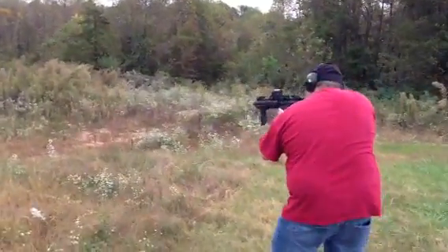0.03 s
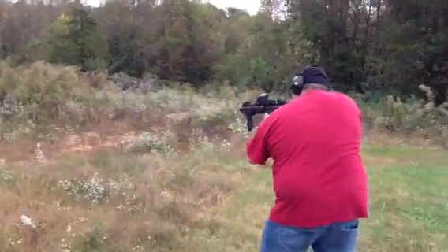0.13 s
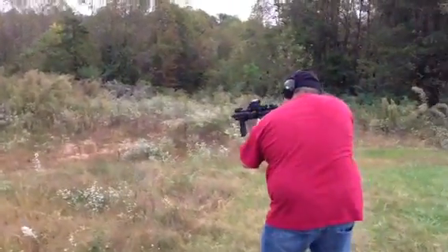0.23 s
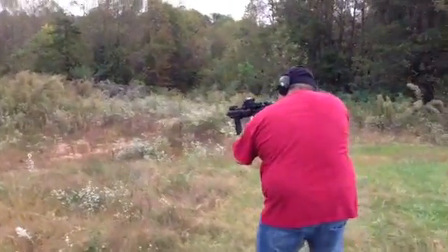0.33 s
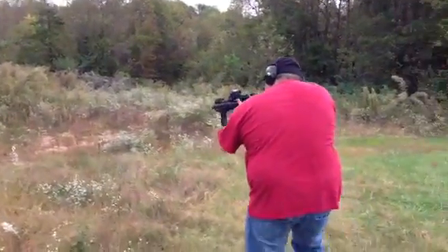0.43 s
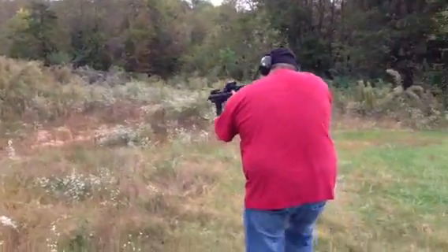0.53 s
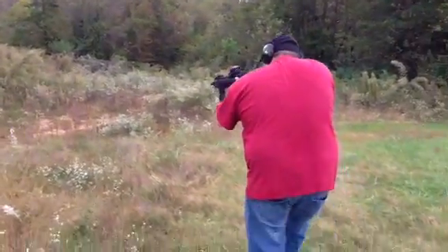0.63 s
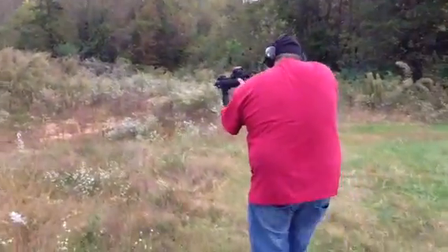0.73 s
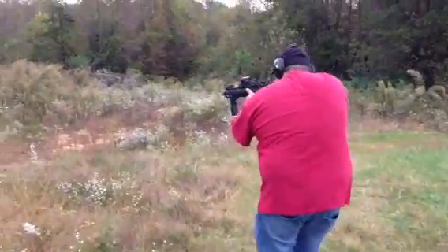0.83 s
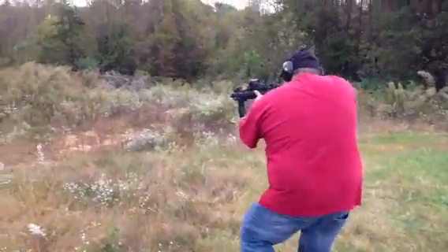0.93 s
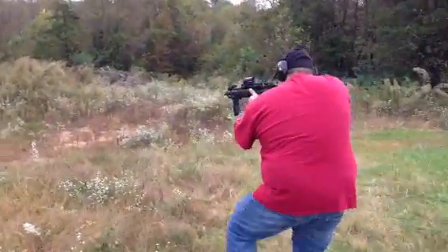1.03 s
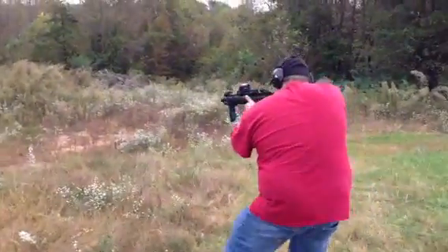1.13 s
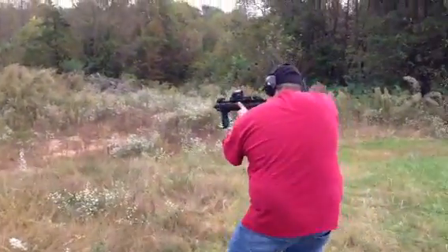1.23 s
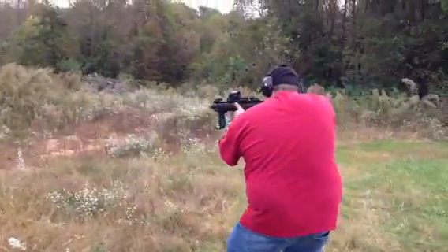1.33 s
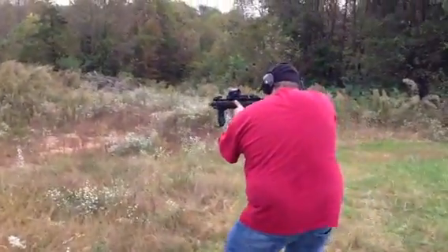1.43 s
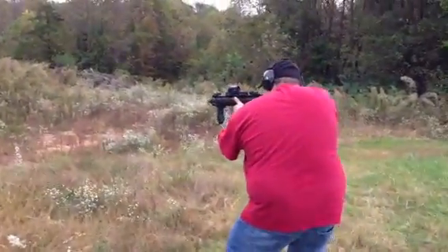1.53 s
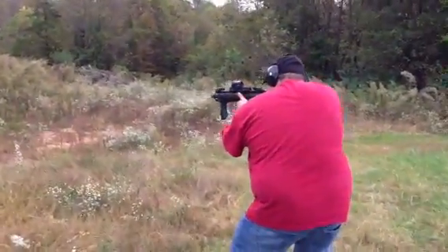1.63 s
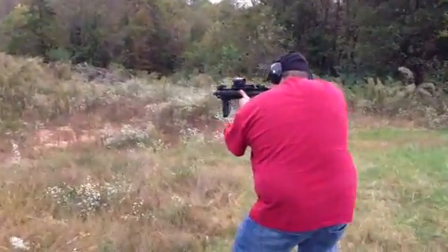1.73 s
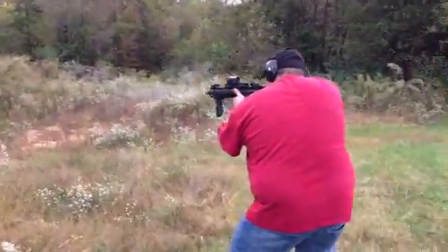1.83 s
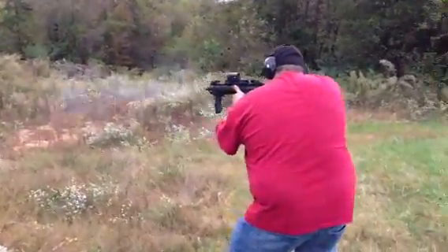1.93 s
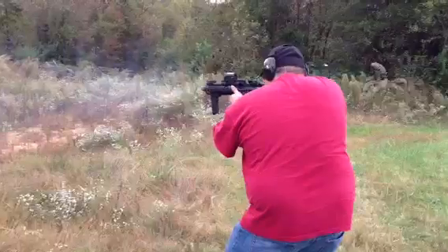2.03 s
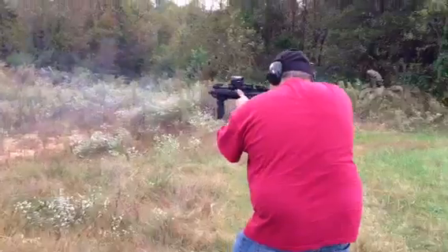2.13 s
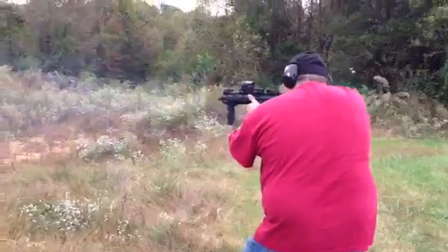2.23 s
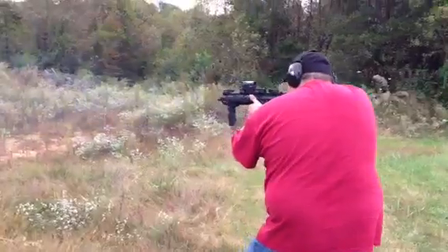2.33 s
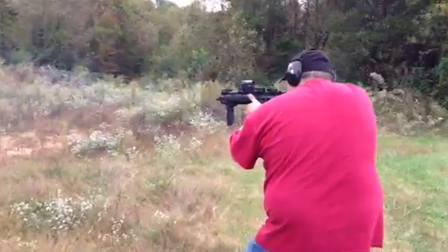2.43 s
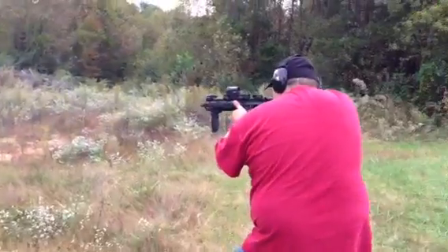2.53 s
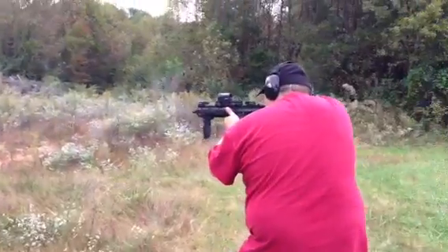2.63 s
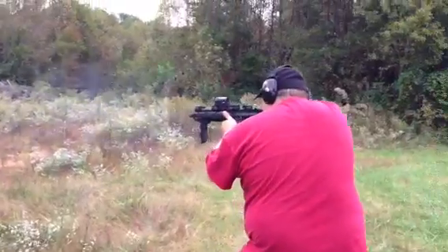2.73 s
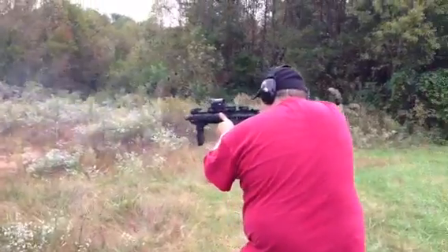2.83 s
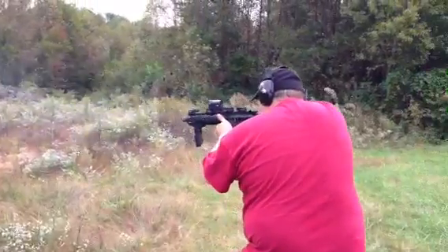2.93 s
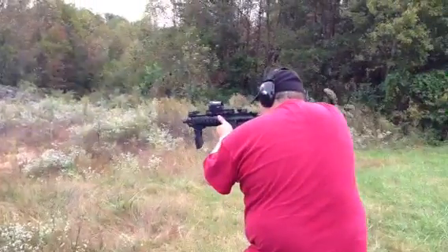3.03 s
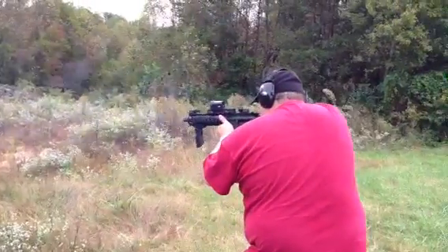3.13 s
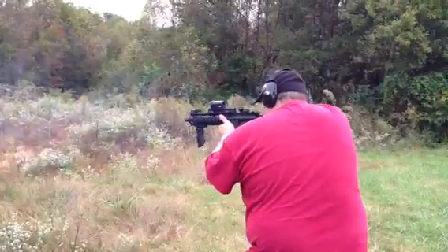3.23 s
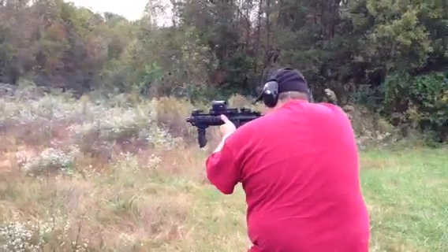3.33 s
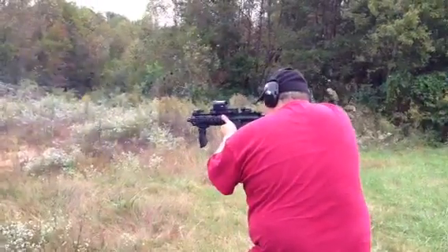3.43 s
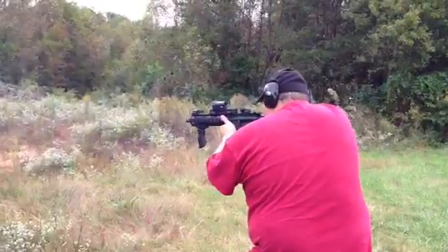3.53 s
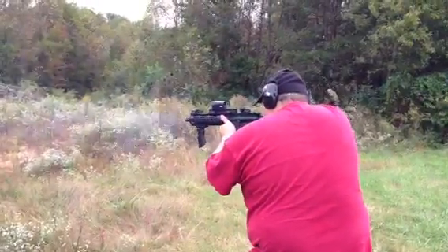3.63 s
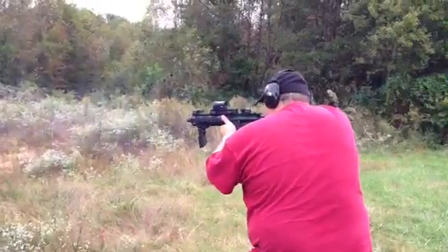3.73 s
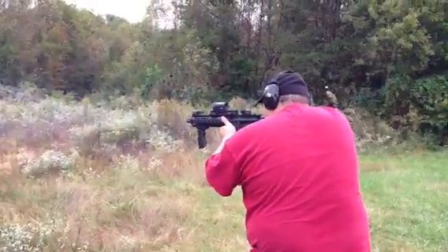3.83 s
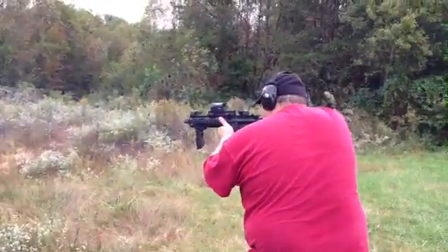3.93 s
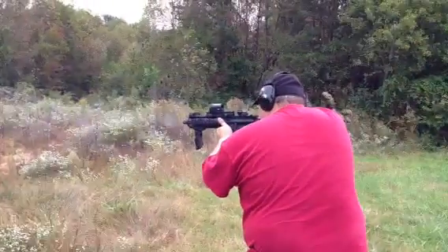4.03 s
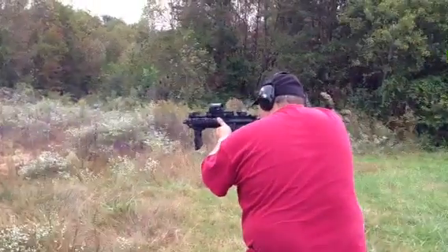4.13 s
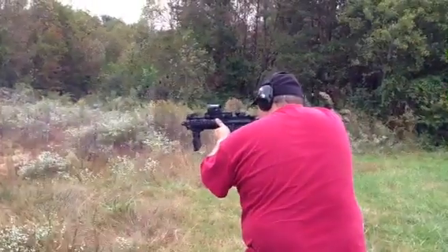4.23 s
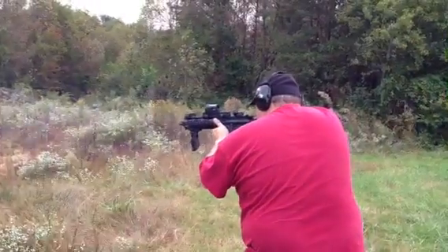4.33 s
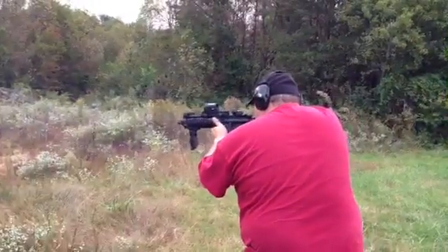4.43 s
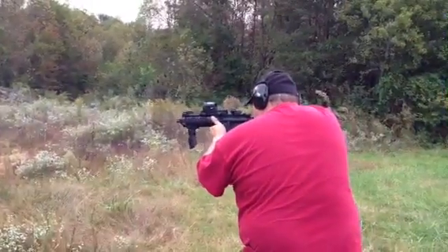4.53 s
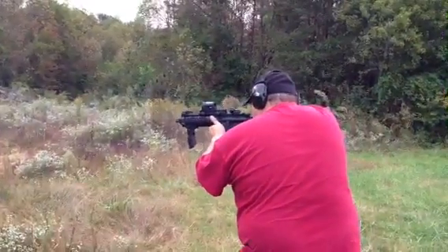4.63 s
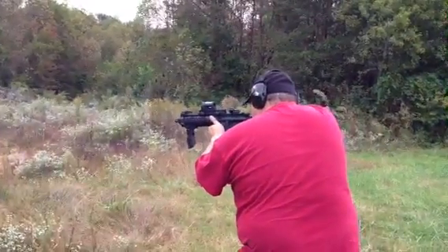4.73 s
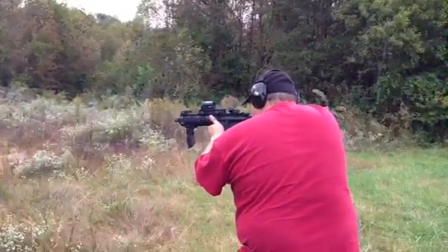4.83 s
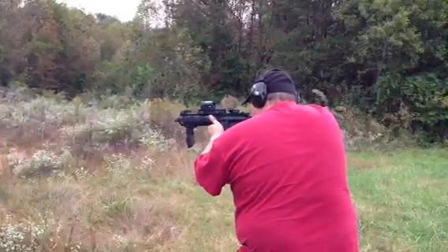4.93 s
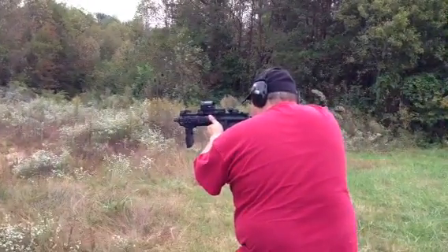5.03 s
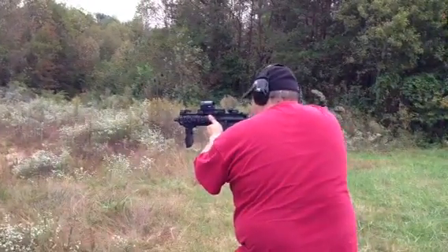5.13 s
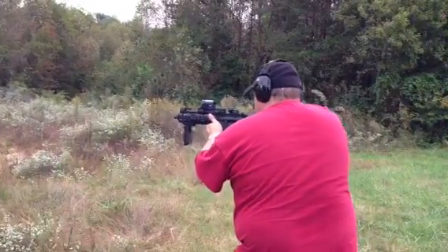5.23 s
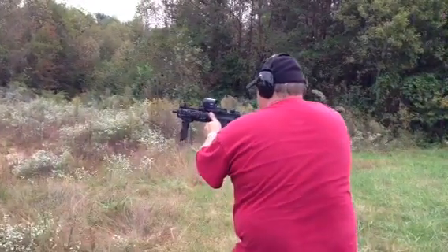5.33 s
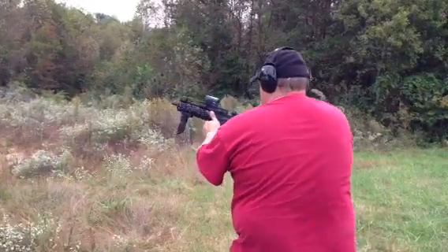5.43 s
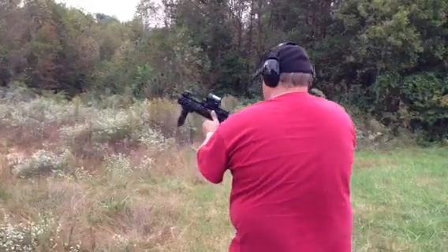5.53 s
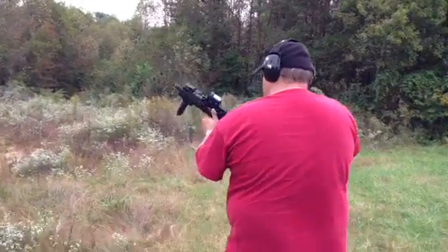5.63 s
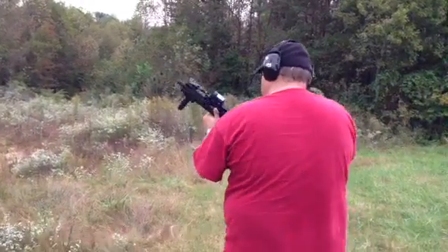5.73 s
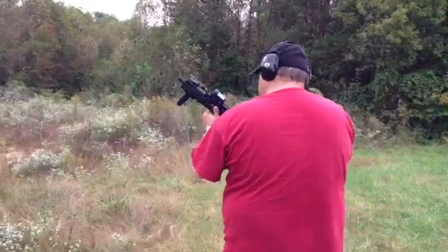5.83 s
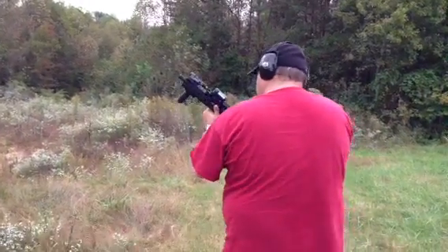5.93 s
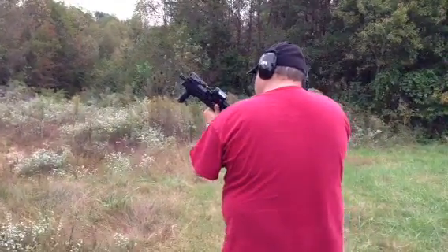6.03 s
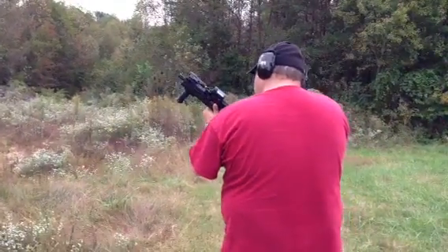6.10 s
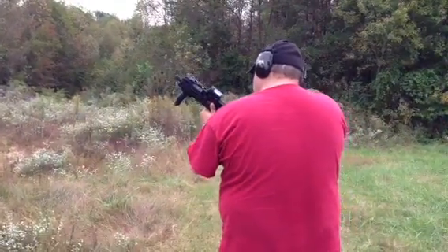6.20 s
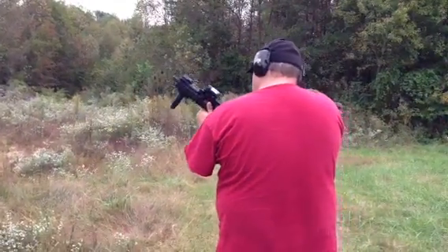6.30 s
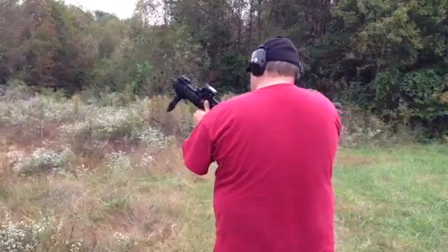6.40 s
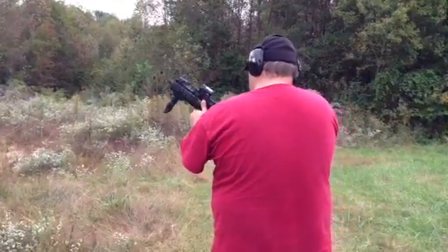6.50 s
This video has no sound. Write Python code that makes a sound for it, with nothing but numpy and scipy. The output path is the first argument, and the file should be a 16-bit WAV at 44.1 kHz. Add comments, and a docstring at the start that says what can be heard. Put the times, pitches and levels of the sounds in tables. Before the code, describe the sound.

Open meadow beside woods, heard from close behind the shooter. For the first 1.9 seconds it is quiet: soft air, the dying roll of earlier fire, thin crickets, evenly spaced katydid rasps, rustling clothes and low footfalls. A sharp double click comes at 0.19, a faint falling bird whistle around 0.4 to 0.9, and small knocks near 1.2 to 1.3. At 1.9 the rifle fires five shots in under 0.3 seconds, hard dry cracks over a short boom. Two-shot bursts follow at 2.7, 3.15 and 3.65, then a single shot at 4.1. Each volley ends with a ringing steel bolt slam and falling zing. The tree line answers with bright grainy slaps, and scattered echoes merge into a long low roll, fading through 4.3 to 6.5. Soft handling knocks and clicks come at 5.3 to 5.7, 6.1 and 6.4, with katydid rasps faintly returning.

```python
"""A rifle close by in a meadow fires four short automatic bursts and a single shot: coloured noise cracks
that decay fast, over a low boom. Steel clacks lead the follow-up shots, and bolt slams ring with a falling zing.
The tree line throws each shot back as a grainy swell; the woods scatter it and roll on, all as shaped noise.
Behind lie noise-band crickets, a rasping katydid, a faint whistled bird, rustling clothes and still air.
The gain ducks under the shots and slowly brings the quiet sounds back; loud peaks saturate."""
import sys
import numpy as np
from scipy import signal
from scipy.fft import rfft, irfft
from scipy.io import wavfile
from scipy.ndimage import uniform_filter1d, minimum_filter1d

SR = 44100
rng = np.random.default_rng(int(sys.argv[2]) if len(sys.argv) > 2 else 0)


def transcribe(u):
    """Save the signal u as a 16-bit wav file named by the first command-line argument.

    u: samples, shape (n,) or (channels, n), limited to [-1, 1]; the rate is SR.
    q: integer samples, one column per channel.
    """
    v = np.clip(np.atleast_2d(u).T, -1, 1)
    q = np.round(v * 32767).astype(np.int16)
    wavfile.write(sys.argv[1], SR, q)


N = 289472
T = np.arange(N) / SR


def undb(db):
    """Amplitude factor of a level in dB."""
    return 10 ** (np.asarray(db) / 20)


def unit(x):
    """Scale x to rms 1."""
    return x / np.sqrt(np.mean(x ** 2))


def fade(t60):
    """Exponential decay by 60 dB in t60 seconds, cut to a quarter second."""
    return undb(-60 * T[:SR // 4] / t60)


def noise(points, size):
    """Noise of rms 1 with the colour of (frequency [Hz], relative level [dB]) points."""
    hz, db = np.transpose(points)
    f = np.fft.rfftfreq(size, 1 / SR) + 1  # keeps the logarithm finite
    colour = undb(np.interp(np.log(f), np.log(hz), db))
    return unit(irfft(rfft(rng.standard_normal(size)) * colour, size))


def band(x, hz, width):
    """Bell-shaped band of x around hz."""
    f = np.fft.rfftfreq(len(x), 1 / SR)
    return irfft(rfft(x) * np.exp(-2 * ((f - hz) / width) ** 2), len(x))


def ring(modes):
    """Damped sine modes after a blow, slightly detuned each time."""
    out = np.zeros(SR // 4)
    for hz, db, t60 in modes:
        detuned_hz = hz * (1 + 0.0014 * rng.standard_normal())
        out += undb(db) * fade(t60) * np.sin(2 * np.pi * detuned_hz * T[:SR // 4])
    return out


def walk(rate):
    """Random line with a spread near 1, drawn through rate new values per second."""
    return np.interp(T * rate, np.arange(N), rng.standard_normal(N))


def swell(centre_s, length_s):
    """Smooth rise and fall around a moment."""
    return np.exp(-(2 * (T - centre_s) / length_s) ** 2)


def add(out, s, x):
    """Mix x into out at time s."""
    i = int(s * SR)
    out[i:i + len(x)] += x[:N - i]


# colour of the far roll of the woods: (frequency [Hz], relative level [dB])
ROLL_COLOUR = [(60, -42), (200, -24), (350, -16.5), (520, -6), (700, -1), (1000, -10), (1500, -19.5),
               (2500, -27.5), (5000, -48)]


def roll_noise():
    """Low noise, as distant woods return it."""
    return noise(ROLL_COLOUR, N)


# roll of earlier fire: level at the start [dB] and fall [dB/s]
OLD_ROLL_DB, OLD_ROLL_DB_PER_S = -60.5, 9.5
# colour of the still air: (frequency [Hz], relative level [dB])
AIR_COLOUR = [(30, -28), (80, -9), (160, 0.5), (320, -9.5), (650, 2.5), (1100, -8.5), (1900, -11.5),
              (3000, -11.5), (6000, -14), (15000, -21)]


def meadow(air_db=-74.5):
    """Slowly wavering noise of still air, and the roll of earlier fire still dying away."""
    air = noise(AIR_COLOUR, N) * undb(air_db + walk(3.0))
    old_roll = roll_noise() * undb(OLD_ROLL_DB - OLD_ROLL_DB_PER_S * T + 2 * walk(42))
    return air + old_roll


# one falling note that levels out
BIRD_S, BIRD_LENGTH_S, BIRD_DB = 0.42, 0.5, -75.5
BIRD_START_HZ, BIRD_END_HZ, BIRD_FALL_HZ_PER_S = 3570, 2790, 2000


def bird():
    """A faint far whistle: a gliding sine, broken up and blurred by the trees."""
    age = T - BIRD_S
    hz = np.clip(BIRD_START_HZ - BIRD_FALL_HZ_PER_S * age, BIRD_END_HZ, BIRD_START_HZ)
    whistle = np.sin(2 * np.pi * np.cumsum(hz) / SR)
    breath = np.sqrt(np.abs(np.sin(np.pi * np.clip(age / BIRD_LENGTH_S, 0, 1))))
    return whistle * breath * walk(280) * undb(BIRD_DB + 3.4 * walk(39))


# bands of the cricket chorus: (centre [Hz], width [Hz], level [dB])
CRICKET_BANDS = [(3070, 250, -94.5), (4100, 300, -87.5), (5600, 600, -95.5)]
# even series of katydid rasps: (first [s], end [s], period [s])
KATYDID_SERIES = [(.15, 1.8, .305), (5.0, 6.55, .358)]
RASP_S = .085


def insects(rasp_db=-82.5):
    """A wavering cricket chorus of noise bands and the evenly spaced, higher rasps of a katydid."""
    chorus = np.zeros(N)
    for hz, width, db in CRICKET_BANDS:
        chorus += unit(band(rng.standard_normal(N), hz, width)) * undb(db + 2.5 * walk(5.6))
    rasps = np.zeros(N)
    for first, end, period in KATYDID_SERIES:
        for s in np.arange(first, end, period):
            rasps += swell(s, RASP_S)
    return chorus + undb(rasp_db) * rasps * unit(band(rng.standard_normal(N), 7730, 450))


# the shooter steps and shifts: (centre [s], length [s], rustle level [dB], thud level [dB])
STEPS_AND_SHIFTS = [(0, 0.59, -79, -75.5), (.6, .45, -75.5, -79), (1.17, 0.46, -69.5, -83),
                    (5.45, 0.83, -99, -82)]


def movement(fidget_db=-86):
    """Clothes and grass rustle with each move, over soft low thuds that never quite stop."""
    rustle_gain = np.zeros(N)
    thud_gain = np.full(N, undb(fidget_db))
    for s, length, rustle_db, thud_db in STEPS_AND_SHIFTS:
        rustle_gain += undb(rustle_db) * swell(s, length)
        thud_gain += undb(thud_db) * swell(s, length)
    thuds = noise([(40, -21.0), (100, -14.0), (160, 4.0), (260, -4.0), (600, -42)], N)
    rustle = noise([(300, -5.0), (2000, -2), (8000, -3.0), (15000, -9)], N)
    return thuds * thud_gain * undb(4 * walk(9)) + rustle * rustle_gain * undb(1.9 * walk(40.8))


SOUND_M_S = 343
# brush, the edge of the wood and two deeper stands of trees:
# (distance [m], level [dB], rise [s], t60 [s])
THICKET_RETURNS = [(4.3, -1.5, .012, 0.71), (26, 0, .022, 2.18), (71.7, -4, .004, 0.3),
                   (89.4, -7.5, .015, 0.52)]


def returns():
    """Strength of the echo after a shot: each thicket answers after the round trip, then fades."""
    power = np.zeros(N)
    for metres, db, rise_s, t60 in THICKET_RETURNS:
        late = T - 2 * metres / SOUND_M_S
        rise_then_fall = np.exp(np.minimum(late / rise_s, -np.log(1000) * late / t60))
        power += (undb(db) * rise_then_fall) ** 2
    return np.sqrt(power)


# the far roll swells, sinks steadily and dies faster where the woods end
ROLL_DB, ROLL_PEAK_S, ROLL_RISE_DB_PER_S, ROLL_FALL_DB_PER_S = -56, 0.35, 45, 7.5
ROLL_END_S, ROLL_END_DB_PER_S = 2.9, 38


def roll_gain():
    """Strength of the far roll after a shot: swell, slow fall, end."""
    late = T - ROLL_PEAK_S
    slope_db = np.minimum(ROLL_RISE_DB_PER_S * late, -ROLL_FALL_DB_PER_S * late)
    end_db = ROLL_END_DB_PER_S * np.maximum(T - ROLL_END_S, 0)
    return undb(ROLL_DB + slope_db - end_db)


# echo colour and loss in air and leaves, a negative loss counting as none:
# (frequency [Hz], relative level [dB], loss [dB/s])
WOODS_COLOUR = [(70, -43, 26), (170, -19.5, 16.5), (317, -12.5, 23), (612, 6, 10), (940, 0, -10.5),
                (1600, 1, 14), (3780, -1.5, 31), (6030, -4.5, 47.5), (10500, -12, 73), (15000, -25, 90.5)]


def echoes(woods_db=-24, lumps_db=3, trunks_db=3.0, blur_s=.45, roll_lumps_db=3):
    """Trunks and leaves scatter each shot back, duller with distance; a low roll lingers."""
    hz, db, loss = np.transpose(WOODS_COLOUR)
    sparse = np.exp(-T / blur_s)  # early returns stand apart, late ones merge
    unevenness_db = sparse * (lumps_db * walk(120) + trunks_db * walk(1200))
    scatter = rng.standard_normal(N) * undb(unevenness_db)
    # colour the scatter and let each frequency lose level with travel time
    f, delay, spectrum = signal.stft(scatter, SR, nperseg=512)
    log_f = np.log(f + 1)
    colour = unit(undb(np.interp(log_f, np.log(hz), db)))
    loss_db_per_s = np.interp(log_f, np.log(hz), np.maximum(loss, 0))
    absorbed = undb(-np.outer(loss_db_per_s, delay))
    woods = signal.istft(spectrum * colour[:, None] * absorbed, SR)[1][:N]
    woods = woods * returns() * undb(woods_db)
    roll = unit(roll_noise() * undb(roll_lumps_db * walk(60))) * roll_gain()
    # every shot sets off the same response
    fired = np.zeros(N)
    for s, _, echo_db, _ in SHOTS_FIRED:
        fired[int(s * SR)] = undb(echo_db)
    return signal.fftconvolve(fired, woods + roll)[:N]


def tree_line(slap_db=-27, delay_s=.17, spread_s=0.051, grain_db=2.5):
    """The edge of the wood throws each shot back as a bright, grainy swell."""
    out, size = np.zeros(N), SR // 2
    t = T[:size]
    slap = np.exp(-np.abs(t - delay_s) / spread_s) * np.minimum(t / delay_s, 1)
    for s, _, _, db in SHOTS_FIRED:
        leaves = noise([(150, -28.5), (600, -6.0), (1800, 5.0), (4500, 1), (7000, -7.5), (15000, -25)], size)
        add(out, s, leaves * slap * undb(slap_db + db + grain_db * walk(1300)[:size]))
    return out


# clicks and knocks: (time [s], level [dB], centre [Hz], t60 [s])
HANDLING_KNOCKS = [(0.1879, -38, 4300, 0.006), (0.1886, -38, 8650, 0.0077), (0.31, -63, 894, 0.06),
                   (1.192, -63, 1810, 0.072), (1.278, -55, 11000, .008), (1.299, -60, 1500, 0.035),
                   (5.291, -68, 4500, 0.011), (5.391, -62, 148, 0.071), (5.55, -61, 169.7, 0.12),
                   (5.678, -68, 1500, 0.012), (5.694, -51, 260, 0.045), (5.698, -56, 3000, 0.015),
                   (6.125, -74, 4040, 0.023), (6.41, -63, 693, 0.0092)]


def handling():
    """Small clicks and knocks of the rifle in the hands: short bursts of noise around a centre."""
    out = np.zeros(N)
    for s, db, hz, t60 in HANDLING_KNOCKS:
        knock = noise([(hz / 4, -34), (hz / 2, -13), (hz, 0), (hz * 3, -14), (hz * 10, -50)], SR // 4)
        add(out, s, undb(db) * fade(t60) * knock)
    return out


# shots closer than the gap belong to one burst; a clack leads each one after its first
BURST_GAP_S, CLACK_LEAD_S, CLACK_DB = .1, .0093, 5.5
# the bolt slams home after the last shot of a burst or the single shot:
# (time [s], relative level [dB], t60 [s], lead of its clack [s], relative clack level [dB])
BOLT_SLAMS = [(2.242, 6, .014, .02, 10), (2.8308, 5, .011, .0096, 1), (3.2980, 3, .0089, .009, 4.5),
              (3.7846, 5, .018, .0078, 2.5), (4.1668, 5, .026, .0063, 1)]
# the bolt bounces after every slam: (delay [s], level relative to the slam [dB], t60 [s])
BOLT_BOUNCES = [(.012, -4.5, 0.0035), (.018, -12.5, 0.0034)]
# colour of blows on the action: (frequency [Hz], relative level [dB])
BLOW_COLOUR = [(60, -25.5), (300, -4.5), (900, -7.5), (2000, -0.5), (3700, 7), (5000, -4), (8000, -9),
               (15000, -24)]
# ring of the steel action: (frequency [Hz], relative level [dB], t60 [s])
STEEL_MODES = [(1228, -6, .06), (2460, 0.5, .08), (2840, 2, 0.21), (3390, 5, 0.072), (4200, -2, 0.045),
               (4240, 10, 0.066), (7116, -9.5, .05), (8748, -6.5, .05)]


def action(clack_db=-14.0, clack_t60=0.02, ring_db=-32,
           spring_db=-23, spring_t60=0.28, spring_hz=3200, fall_s=0.039):
    """Steel hits steel: a short crack, the ring of the receiver and the falling zing of the recoil spring."""
    out, size = np.zeros(N), SR // 4
    clacks = [(s - lead, db) for s, _, _, lead, db in BOLT_SLAMS]
    for last, shot in zip(SHOTS_FIRED, SHOTS_FIRED[1:]):
        if shot[0] - last[0] < BURST_GAP_S:
            clacks.append((shot[0] - CLACK_LEAD_S, CLACK_DB))
    for s, db in clacks:
        crack = noise([(200, -21), (1500, -26), (4200, 8.0), (7000, -5), (15000, -14)], size)
        crack = crack * fade(clack_t60)
        add(out, s, undb(db + clack_db) * (crack + undb(ring_db) * ring(STEEL_MODES)))
    zing_hz = 900 + spring_hz * np.exp(-T[:size] / fall_s)  # highs run through the coils first
    zing = np.sin(2 * np.pi * np.cumsum(zing_hz) / SR)
    for s, db, slam_t60, _, _ in BOLT_SLAMS:
        blows = [(s, db, slam_t60)]
        blows += [(s + delay, db + drop, t60) for delay, drop, t60 in BOLT_BOUNCES]
        for at, blow_db, t60 in blows:
            spring = undb(spring_db) * zing * walk(1400)[:size] * fade(spring_t60)
            crack = noise(BLOW_COLOUR, size) * fade(t60)
            add(out, at, undb(blow_db) * (crack + undb(ring_db) * ring(STEEL_MODES) + spring))
    return out


# blast colour: (frequency [Hz], relative level [dB])
BLAST_COLOUR = [(30, -19), (100, -27), (180, -18), (270, -3.5), (600, 5), (1000, -2.5), (2000, 0),
                (3000, 1.5), (4100, 4), (5500, -2.5), (8000, -3.5), (11000, -7.5), (15000, -12)]
# low ring of the blast: (frequency [Hz], relative level [dB], t60 [s])
BOOM_MODES = [(269, 2.5, 0.054), (307, -7, 0.083), (363, -12.5, .035), (484.5, -3.5, 0.07),
              (620, 3.5, 0.05), (665, -4, 0.12)]
# shots, each level relative within its own layer:
# (time [s], blast level [dB], echo level [dB], tree line level [dB])
SHOTS_FIRED = [(1.9052, 4, -2.5, 0), (1.9720, 0, 0, -1.5), (2.0394, 2.5, 6, 1.5), (2.1074, 2.5, 5.5, 15.5),
               (2.1738, 1.5, 2.5, -7.5), (2.6970, 6, -1, 3.5), (2.7629, -1, 2, -6.5), (3.1661, 13, -1, -6),
               (3.2312, 3.5, 1.5, -3), (3.6509, 5.5, -0.5, 0.5), (3.7160, 2, 2.5, -4.5),
               (4.1022, 10, 1.5, -0.5)]


def blasts(crack_db=1, crack_t60=0.046, ground_s=.0052, ground_db=-2, spray_db=-10.5, spray_t60=0.16,
           boom_db=-11, hammer_db=-23, hammer_s=0.0065, crackle_db=2.5):
    """Hammer fall, then the muzzle blast, its bounce off the ground and a spray of returns from the grass."""
    out, size = np.zeros(N), SR // 4
    # part of the paths is the same for every shot
    shared_crack, shared_spray = noise(BLAST_COLOUR, size), noise(BLAST_COLOUR, size)

    def crack():
        fresh = unit(shared_crack + 1.65 * noise(BLAST_COLOUR, size))
        return fresh * fade(crack_t60) * undb(crack_db)

    for s, db, _, _ in SHOTS_FIRED:
        crackle = undb(crackle_db * walk(1500)[:size])
        grass = unit(shared_spray + 1.1 * noise(BLAST_COLOUR, size)) * crackle
        grass = grass * fade(spray_t60) * (1 - fade(.02)) * undb(spray_db)  # builds up, then decays
        add(out, s, undb(db) * (crack() + grass))
        add(out, s + ground_s, undb(db + ground_db) * crack())
        add(out, s + .002, undb(db + boom_db) * ring(BOOM_MODES) * (1 - fade(0.012)))
        thud = noise([(40, -24.0), (260, -15.5), (700, -3), (3000, -13.5), (6000, -19.0)], size) * fade(0.02)
        one_mode = ring(STEEL_MODES[2:3])
        add(out, s - hammer_s, undb(hammer_db) * (thud + 0.6 * one_mode))
    return out


def scene():
    """All layers, from the background to the shots."""
    background = meadow() + bird() + insects() + movement()
    woods = echoes() + tree_line()
    rifle = handling() + action() + blasts()
    return (background + woods + rifle)[None]


def held_db(x, release_db):
    """Level of x, held at its peaks and falling by at most release_db each second."""
    level_db = 10 * np.log10(uniform_filter1d(x ** 2, SR // 200) + 1e-12)
    return np.maximum.accumulate(level_db + release_db * T) - release_db * T


TOP_HZ = 15400


def record(dry, limit_db=-9, recover_db=130, ceiling=0.48,
           loud_db=-10, boost_db=12, release_db=8.5, low_cut_hz=130):
    """A fast limiter ducks, a slow gain lifts quiet passages; peaks saturate, bass and top are cut."""
    x = dry[0]
    x = x * undb(np.minimum(limit_db - held_db(x, recover_db), 0))
    lift_db = np.clip(loud_db - held_db(x, release_db), 0, boost_db)
    x = x * undb(minimum_filter1d(lift_db, size=600))  # it looks a few milliseconds ahead
    x = ceiling * np.tanh(x / ceiling)
    x = signal.sosfilt(signal.butter(1, low_cut_hz, "high", fs=SR, output="sos"), x)
    return signal.sosfilt(signal.ellip(10, .2, 70, TOP_HZ, fs=SR, output="sos"), x)[None]


dry = scene()
out = record(dry)
transcribe(out)
```